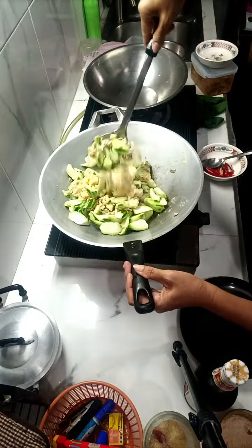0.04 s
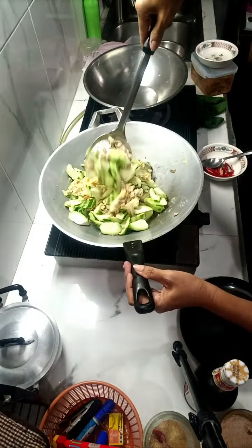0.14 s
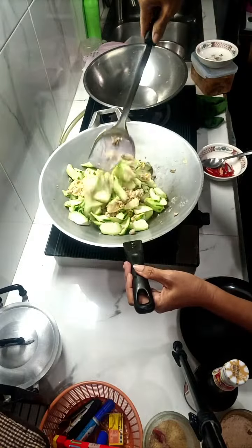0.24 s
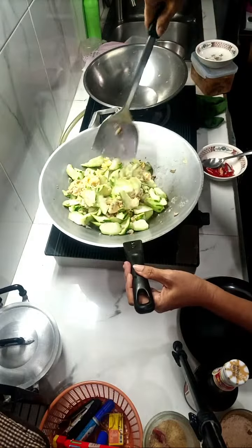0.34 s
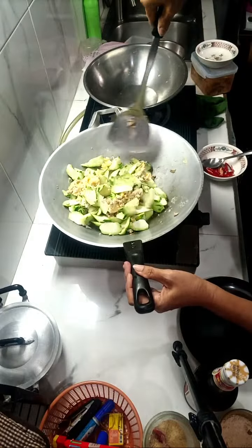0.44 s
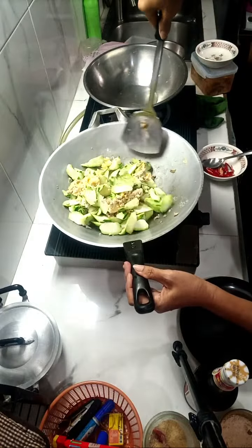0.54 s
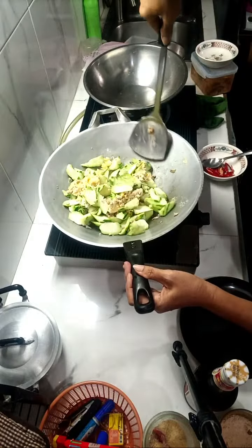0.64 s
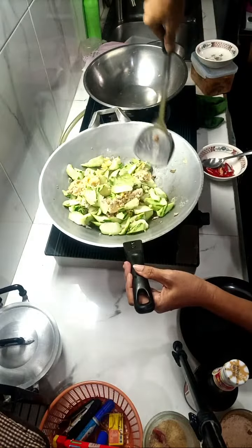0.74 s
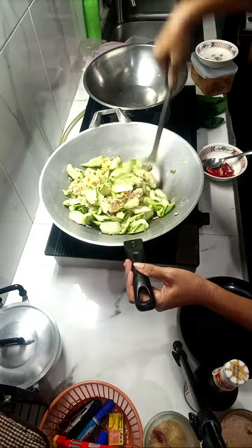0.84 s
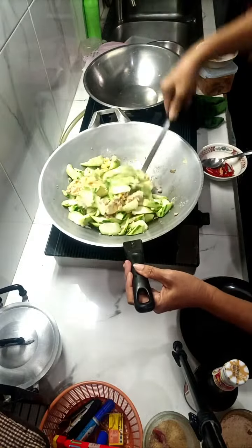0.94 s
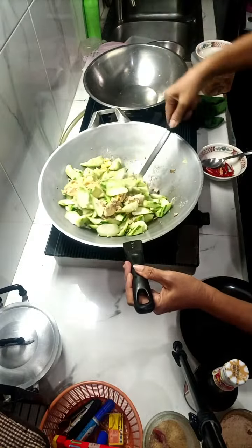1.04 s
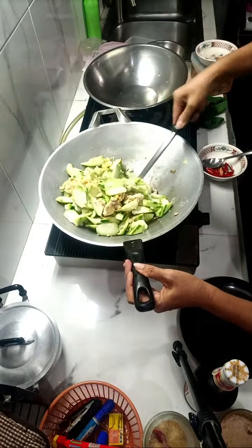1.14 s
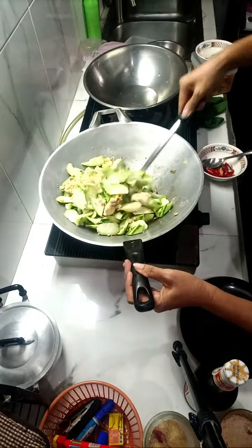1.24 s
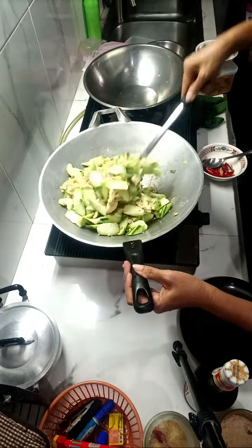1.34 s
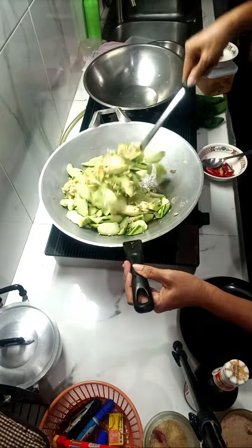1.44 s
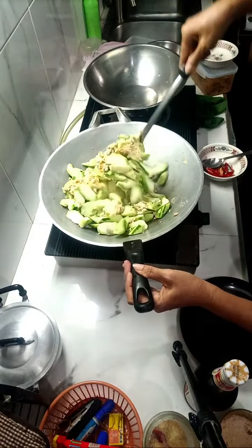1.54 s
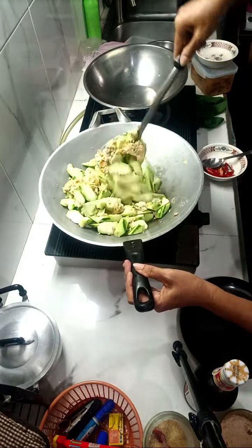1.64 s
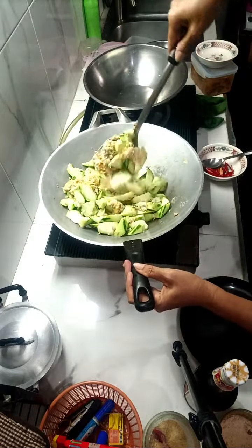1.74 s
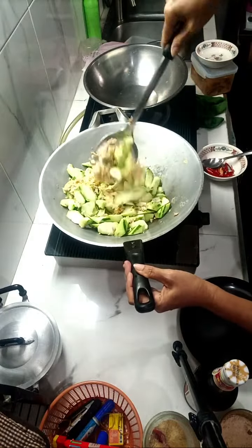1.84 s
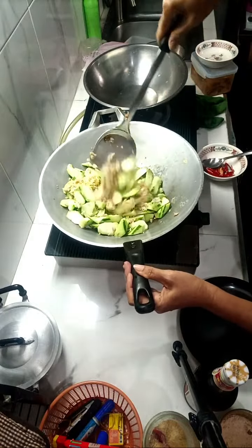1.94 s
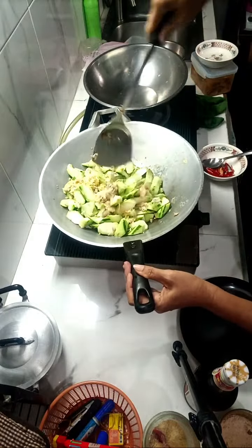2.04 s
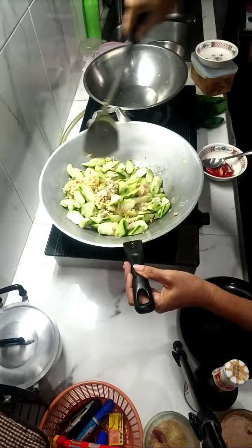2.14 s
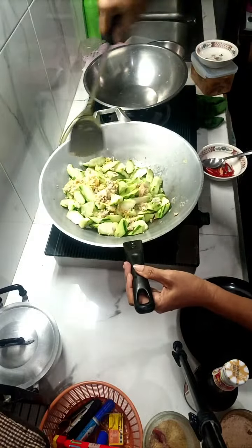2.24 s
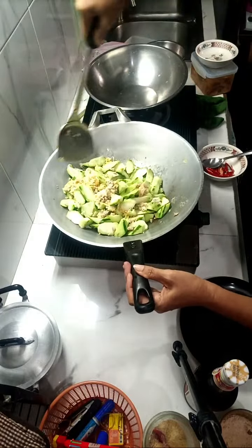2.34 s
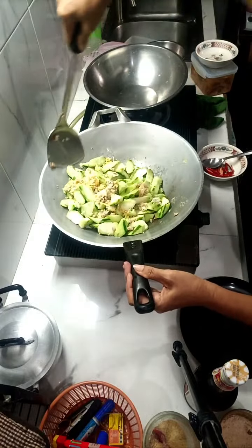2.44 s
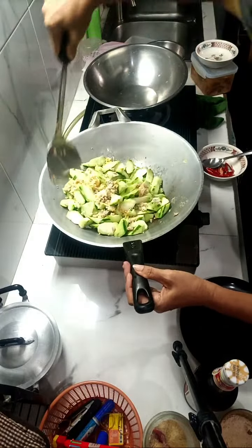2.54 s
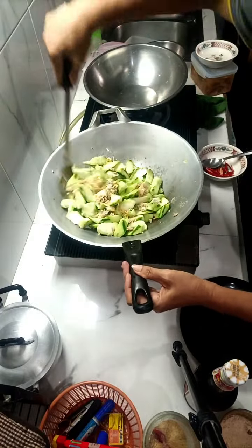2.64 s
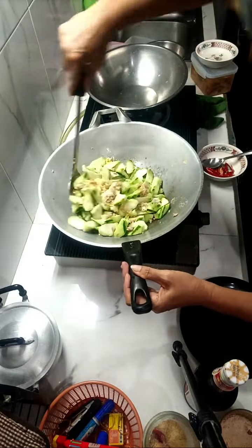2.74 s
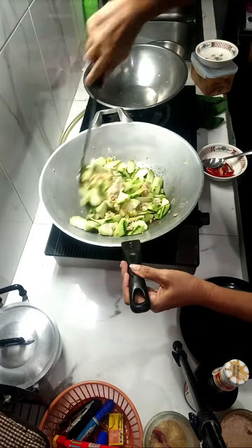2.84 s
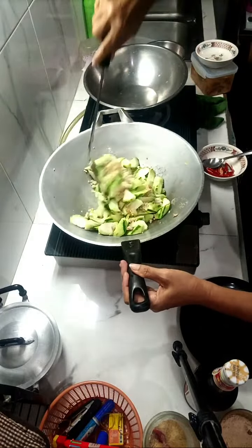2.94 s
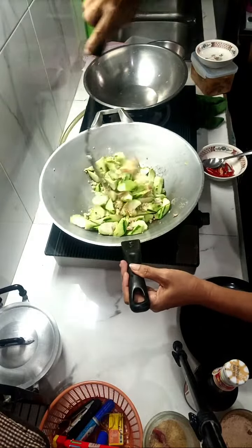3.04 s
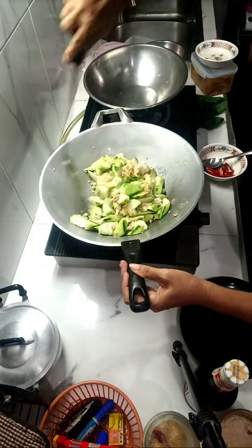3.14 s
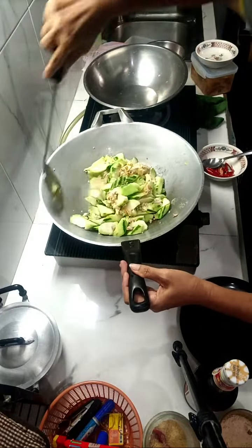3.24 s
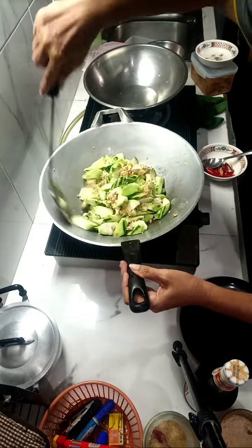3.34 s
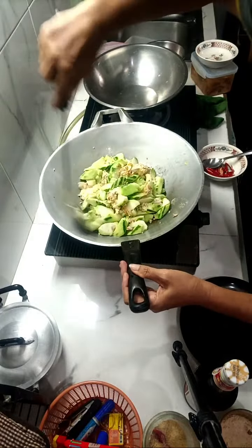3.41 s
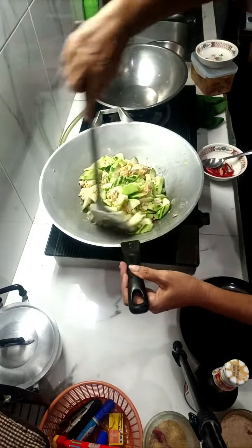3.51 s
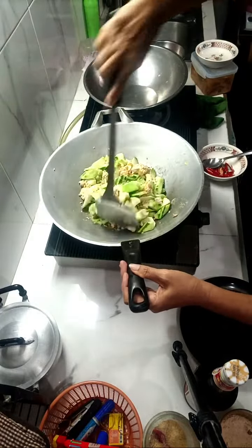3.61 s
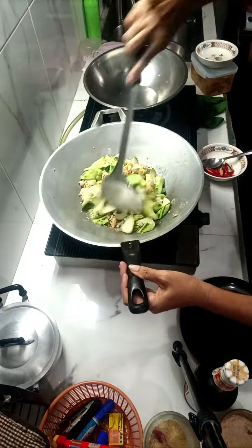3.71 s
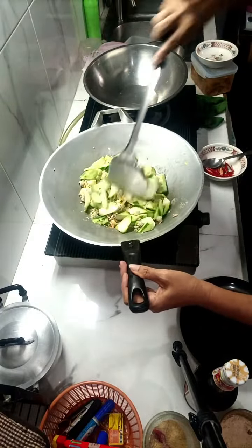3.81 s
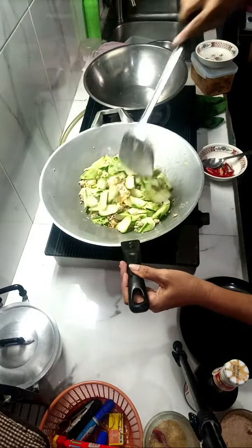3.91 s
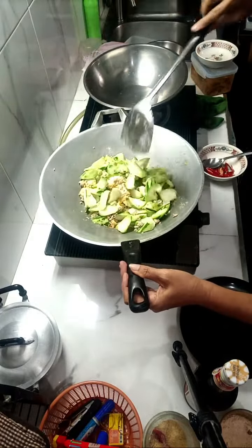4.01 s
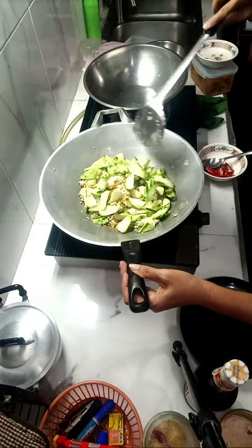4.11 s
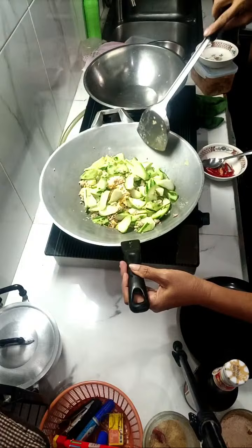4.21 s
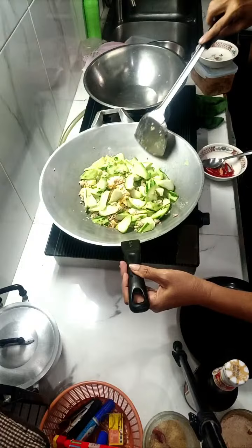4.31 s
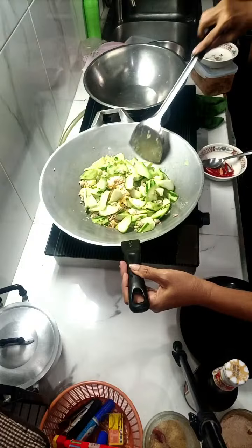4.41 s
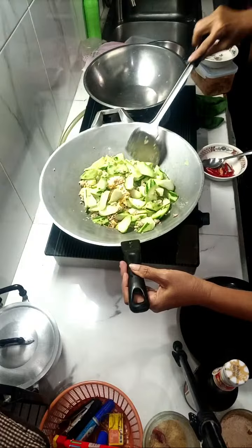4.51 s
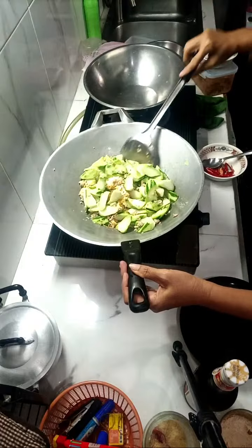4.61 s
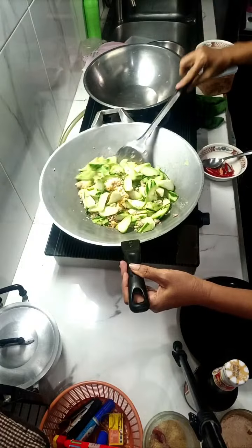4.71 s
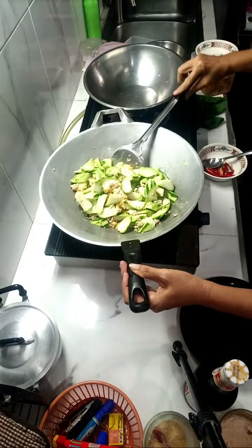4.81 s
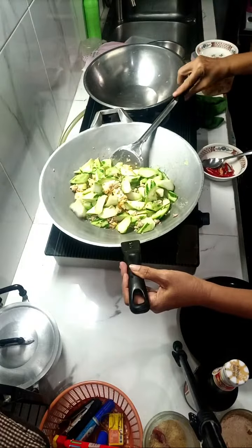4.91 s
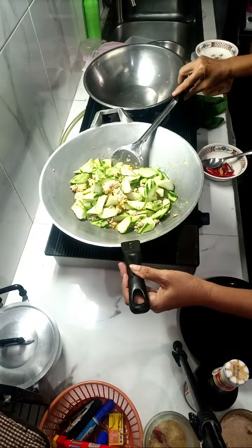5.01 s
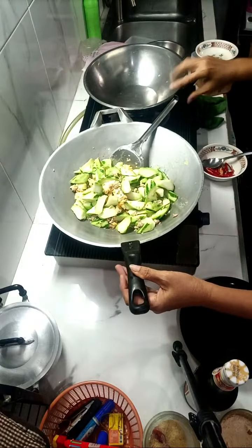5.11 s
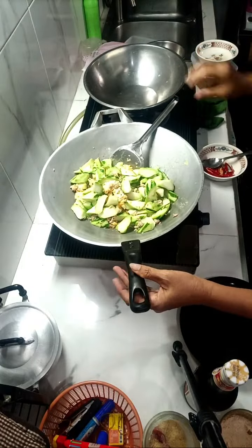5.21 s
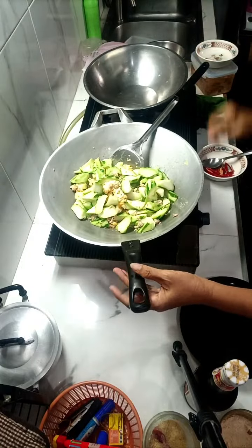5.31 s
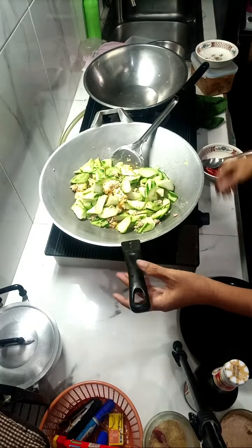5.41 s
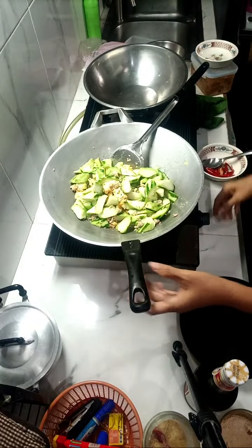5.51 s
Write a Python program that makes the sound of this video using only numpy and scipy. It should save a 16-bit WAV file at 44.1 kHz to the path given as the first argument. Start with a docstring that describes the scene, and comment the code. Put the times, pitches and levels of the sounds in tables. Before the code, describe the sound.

Close by in a small tiled kitchen, a faint sizzle and a low room hum are broken by a sharp clank and scrape of a metal spatula in a wok. Dull knocks follow as the wok rocks on its stand. More clanks, gritty scrapes and brief squeals come in uneven bursts, with a soft wet rustle of vegetables being turned, and a few light knocks finish it.

```python
"""Clanks and scrapes of a steel spatula in a metal wok: vegetables stir-fried in a small tiled kitchen.
Blows ring the modes of wall and blade; the sliding edge sticks, slips and briefly squeals.
As the food is turned over, the loaded wok knocks dully on its stand.
Below lie a faint sizzle of bursting droplets and the hum of the room."""
import sys
import numpy as np
from scipy import signal
from scipy.io import wavfile

SR = 44100
rng = np.random.default_rng(int(sys.argv[2]) if len(sys.argv) > 2 else 0)


def log_audio(samples):
    """Write samples as a 16-bit WAV file to the path given in sys.argv[1]."""
    # one column per channel
    frames = np.atleast_2d(samples).T
    # limit to full scale, then quantise
    limited = np.clip(frames, -1, 1)
    pcm = np.round(limited * 32767).astype(np.int16)
    wavfile.write(sys.argv[1], SR, pcm)


N = 245318
T = np.arange(N) / SR


def from_db(db):
    """Decibels to gain."""
    return 10 ** (np.asarray(db) / 20)


def unit_rms(x):
    """Scale to unit power."""
    return x / np.sqrt(np.mean(x ** 2) + 1e-20)


def at_hz(points, hz):
    """Read a table on a log-frequency axis."""
    freqs, values = np.transpose(points)
    return np.interp(np.log(hz), np.log(freqs), values)


def add(track, time_s, sound):
    """Mix a sound in at a given time."""
    start = max(round(time_s * SR), 0)
    track[start:start + len(sound)] += sound[:N - start]


def butter(x, order, hz, kind="low"):
    """Butterworth filter."""
    return signal.sosfilt(signal.butter(order, hz, kind, fs=SR, output="sos"), x)


def resonate(x, resonances):
    """Parallel resonators, alternating in sign."""
    out = np.zeros_like(x)
    for k, (hz, width_hz, db) in enumerate(resonances):
        r = np.exp(-np.pi * width_hz / SR)
        feedback = [1, -2 * r * np.cos(2 * np.pi * hz / SR), r * r]
        out += (-1) ** k * from_db(db) * signal.lfilter([1 - r * r, 0, r * r - 1], feedback, x)
    return out


def through_bands(spectrum, drive):
    """Third-octave bands, each fed by drive(hz) and weighted by the spectrum."""
    edges_hz = 35 * 2 ** (np.arange(28) / 3.04)
    out = np.zeros(N)
    for low, high in zip(edges_hz, edges_hz[1:]):
        hz = np.sqrt(low * high)
        if spectrum[0][0] < high and low < spectrum[-1][0]:
            out += from_db(at_hz(spectrum, hz)) * butter(drive(hz) + 1e-18, 3, [low, high], "band")
    return out


def drift(rate_hz):
    """Bounded random wander, unit RMS."""
    knots = rng.uniform(-0.92, 1, 6000)
    return unit_rms(np.interp(T * rate_hz, np.arange(len(knots)), knots))


def grains(per_s, spread_db):
    """Random impulses of uneven size, unit RMS."""
    sizes = from_db(spread_db * np.minimum(rng.exponential(1, N), 4)) * rng.choice([-1, 1], N)
    return unit_rms(sizes * (rng.random(N) < per_s / SR))


def decay(t60_s):
    """One second of exponential decay."""
    return from_db(-60 * T[:SR] / max(t60_s, .003))


def mode(hz, t60_s):
    """Struck mode of unit height, random sign."""
    return np.sin(2 * np.pi * hz * T[:SR]) * decay(t60_s) * rng.choice([-1, 1])


def room_hum(level_db=-62):
    """Steady low noise of the room."""
    # (frequency [Hz], band gain [dB])
    spectrum = [(18, -43), (30, -21), (43, -12.5), (70, -10), (118, 0.5), (204, -16.5), (284, -4),
                (370, -24), (465, -7.5), (761, -15.5), (923, -8.5), (1030, -20), (1200, -10), (2000, -35.5),
                (2600, -42), (4400, -120)]
    return from_db(level_db) * unit_rms(through_bands(spectrum, lambda hz: rng.standard_normal(N)))


def kitchen(x, wet_db=-13, t60_s=0.45, cutoff_hz=5000):
    """Direct sound plus dense, slightly dull reflections from the tiles."""
    echoes = rng.standard_normal(SR) * decay(t60_s) * (T[:SR] > .004)
    echoes = butter(echoes / np.linalg.norm(echoes), 1, cutoff_hz)
    return x + from_db(wet_db) * signal.fftconvolve(x, echoes)[:N]


def stroke_levels(bite_s=0.022, lift_t60_s=0.19):
    """Each spatula stroke bites in, eases off and lifts; returns the drive of wall, blade and food."""
    # (start [s], end [s], wall [dB], blade [dB], food [dB], easing of pressure [dB/s])
    strokes = [(0.793, 0.932, -26.5, -28.5, -36.5, 99.5), (0.959, 1.02, -39, -47.5, -50, 20),
               (1.131, 1.188, -49, -59, -58, 9), (2.475, 2.574, -36.5, -44.5, -48, 23),
               (2.59, 2.698, -44.5, -44.5, -51.5, 61), (3.27, 3.392, -44, -41, -65, 45),
               (3.437, 3.496, -34.5, -40.5, -48.5, 26), (4.379, 4.45, -33.5, -50, -48, 10),
               (4.48, 4.771, -34.5, -44.5, -50.5, 58)]
    drive = np.zeros((3, N))
    for start, end, *levels_db, easing in strokes:
        bite = np.clip((T - start) / bite_s, 0, 1)
        eased_db = easing * np.clip(T - start, 0, end - start)
        lifted_db = 60 * np.maximum(T - end, 0) / lift_t60_s
        drive += np.outer(from_db(levels_db), bite * from_db(-eased_db - lifted_db))
    return drive


def rustle(rest_db=-67):
    """Wet slices simmer at rest and slide over each other under the spatula."""
    # (frequency [Hz], band gain [dB])
    spectrum = [(900, -16.5), (1400, 3.5), (2100, 1.5), (2800, 0), (3600, -1), (5000, -9), (7000, -16.5)]
    _, _, pushed = stroke_levels()
    texture = through_bands(spectrum, lambda hz: grains(7500, spread_db=2) * from_db(0.99 * drift(8.6)))
    return np.hypot(from_db(rest_db), pushed) * unit_rms(texture)


def sizzle(rise_db_per_s=155, fall_db_per_s=71.5):
    """Droplets burst on the hot metal, flaring when liquid runs onto a bare spot."""
    # (frequency [Hz], band gain [dB])
    spectrum = [(3240, -53), (5500, -38), (6400, -6), (6910, -23.5), (7660, -10.5), (8000, -12),
                (8750, -10.5), (10500, -5.5), (11900, -3), (15000, -4.5), (16000, -8)]
    # steady sizzle: (time [s], level [dB])
    bed = [(0, -69), (1.5, -67), (4.5, -66), (5.56, -69)]
    # (peak time [s], level [dB])
    flares = [(0.79, -43.5), (1.23, -58.5), (2.46, -57), (2.62, -56), (3.46, -60), (4.42, -61)]
    power = from_db(np.interp(T, *np.transpose(bed))) ** 2
    for peak_s, db in flares:
        power += from_db(db - np.maximum(rise_db_per_s * (peak_s - T), fall_db_per_s * (T - peak_s))) ** 2
    droplets = through_bands(spectrum, lambda hz: grains(17000, spread_db=1.5))
    return np.sqrt(power) * unit_rms(droplets)


def brief_tones(waver_depth=0.027, waver_hz=600, flutter_db=5, flutter_hz=150):
    """Wavering squeals of the sliding edge, and clear wok notes singing on after a blow."""
    # (start [s], end [s], start pitch [Hz], end pitch [Hz], level [dB], roughness [factor])
    notes = [(0.081, 0.27, 2170, 2180, -64, 1.15), (0.504, 0.632, 2020, 2136, -60.5, 0.9),
             (0.799, 0.892, 2190, 2250, -30, 0.69), (0.79, 0.857, 1151, 1154, -27, 0),
             (0.88, 0.92, 1149, 1170, -29.5, 0.16), (1.548, 1.588, 3400, 3470, -57.5, 0.36),
             (1.674, 1.828, 340.4, 324, -53, 0.42), (2.5, 2.561, 3200, 3410, -44, 0.4),
             (2.576, 2.713, 3300, 3440, -52.5, 0.13), (2.6, 2.73, 2080, 2300, -54.5, 0.6),
             (3.31, 3.386, 3650, 3390, -48.5, 0.65), (3.31, 3.39, 1153, 1149, -30, .1),
             (3.454, 3.517, 3950, 3710, -48.5, 1.13), (4.275, 4.378, 1826, 1825, -26.5, .04),
             (4.386, 4.452, 1145, 1160, -35, 0.1), (4.391, 4.458, 3500, 3630, -46.5, 0.5),
             (4.578, 4.686, 4000, 3380, -58, 0.46), (4.638, 4.755, 1370, 1450, -45, 0.9),
             (4.662, 4.742, 2364, 2340, -55, 0.6), (4.673, 4.768, 4200, 4530, -63, 0.5),
             (4.71, 4.759, 1147, 1136, -38, 0.47)]
    waver = waver_depth * drift(waver_hz)
    flutter = flutter_db * drift(flutter_hz)
    out = np.zeros(N)
    for start, end, from_hz, to_hz, db, roughness in notes:
        span = slice(int(start * SR), int(end * SR))
        progress = np.linspace(0, 1, len(T[span]))
        hz = (from_hz + (to_hz - from_hz) * progress) * (1 + roughness * waver[span])
        level = from_db(db + roughness * flutter[span]) * np.abs(np.sin(np.pi * progress)) ** .5
        out[span] += level * np.sin(2 * np.pi * np.cumsum(hz) / SR)
    return out


def scrapes(wall_db=-3, blade_db=-3, grit_db=-15, slips_per_s=800, judder_db=2, judder_hz=70):
    """The edge sticks and slips along the metal and keeps wall and blade ringing."""
    # resonances, both: (frequency [Hz], width [Hz], gain [dB])
    wall_modes = [(740, 30, -5), (930, 84, 0.5), (1110, 27, 11), (1280, 32, -8.5), (1363, 110, -1)]
    blade_modes = [(1776, 44, 0), (2097, 150, -1.5), (2380, 70, -4.5), (3370, 200, -6.5), (3700, 280, -6),
                   (4630, 300, -9.5)]
    wall_drive, blade_drive, _ = stroke_levels()
    slips = grains(slips_per_s, spread_db=3) * from_db(judder_db * drift(judder_hz))
    wall = from_db(wall_db) * unit_rms(butter(resonate(slips, wall_modes), 2, [500, 1700], "band"))
    blade = from_db(blade_db) * unit_rms(butter(resonate(slips, blade_modes), 3, [1400, 5200], "band"))
    grit = from_db(grit_db) * unit_rms(butter(slips, 4, 8500, "high"))
    return wall_drive * wall + blade_drive * (blade + grit)


def rocking(period_s=0.041, loss_db=7.5, pitch_rise=0.152):
    """The wok rocks back, each rebound weaker and higher; lists every contact with the stand."""
    # contacts with the stand, some of them rebounds of the knock just before, each followed by its listed
    # rebounds: (time [s], level [dB], centre [Hz], ring length [factor], rebounds [count])
    contacts = [(0.003, -41.5, 712, 1.28, 0), (0.836, -23, 440, 2.34, 0), (0.855, -27, 587, 1.9, 0),
                (0.987, -21.5, 415, 0.96, 0), (1.010, -18, 534, 1.32, 0), (1.142, -17, 429, 0.83, 0),
                (1.183, -24, 558, 0.7, 1), (1.293, -23.5, 488, 0.79, 0), (1.497, -42, 452, 2.54, 0),
                (1.529, -30.5, 483, 0.86, 0), (1.854, -37, 508, 1.46, 0),
                (1.917, -32.5, 672, 0.76, 0), (2.540, -29.5, 276, 0.77, 0), (2.591, -34, 560, 1.1, 0),
                (2.675, -34, 740, 0.66, 1), (2.835, -42, 440, 1.6, 0), (2.909, -30, 608, 1.41, 0),
                (3.369, -28.5, 490, 1.4, 0), (3.466, -20, 451.5, 1.54, 2),
                (3.596, -25.5, 487, 0.68, 0), (3.717, -25.5, 467, 0.18, 0),
                (3.867, -29.5, 568, 1.1, 0), (4.020, -33, 597, 0.9, 0), (5.104, -43.5, 563, 2.2, 0),
                (5.197, -31.5, 435, 2.4, 0), (5.257, -29.5, 521, 0.62, 1)]
    return [(time_s + k * period_s, db - k * loss_db, centre_hz * (1 + pitch_rise) ** k, length)
            for time_s, db, centre_hz, length, rebounds in contacts
            for k in range(1 + round(rebounds))]


def knocks(thud_db=9, ring_db=-1, bump_db=3, bump_t60_s=0.091, thud_t60_s=0.26, focus_db=7):
    """Wok on its stand, cushioned by food: a short bump, a thud and the low modes of the bowl."""
    # (frequency [Hz], level [dB], t60 [s])
    bowl_modes = [(240.7, -5, 0.21), (282.6, -10, 0.2), (341.2, -11.5, 0.27), (405, -13.5, 0.12),
                  (455.5, -2, 0.1), (599.5, -6, 0.24), (654, -6.5, 0.27), (705.3, -4.5, 0.25)]
    # (frequency [Hz], band gain [dB])
    thud_spectrum = [(100, -12), (180, -24), (250, 1.5), (450, -4), (720, -7), (900, -8.5), (1150, -17.5),
                     (1500, -27.5), (3000, -28.5)]
    onset = 1 - decay(t60_s=0.025)   # each knock swells in over a few cycles

    def strength(db, centre_hz, hz):
        return from_db(db - focus_db * min(np.log2(hz / centre_hz) ** 2, 1))

    def thud(hz):
        level = np.zeros(N)
        for time_s, db, centre_hz, length in rocking():
            add(level, time_s - .005, strength(db, centre_hz, hz) * onset * decay(thud_t60_s * length))
        return level * rng.standard_normal(N)

    tones = np.zeros(N)
    for time_s, db, centre_hz, length in rocking():
        blow = from_db(db + bump_db) * mode(centre_hz, bump_t60_s)
        for hz, mode_db, t60_s in bowl_modes:
            shifted_hz = hz * (1 + .006 * rng.standard_normal())   # the load moves about
            gain = from_db(ring_db + mode_db) * strength(db, centre_hz, hz)
            blow += gain * mode(shifted_hz, t60_s * length)
        add(tones, time_s - .003, onset * blow)
    tones = butter(tones, 4, 950)
    tones = butter(tones, 3, 130, "high")   # little radiates below the lowest modes
    return from_db(thud_db) * through_bands(thud_spectrum, thud) + tones


def clustered(x):
    """Sheet modes crowd in groups with quiet gaps between."""
    # (frequency [Hz], width [Hz], share removed [dB, capped at 0])
    gaps = [(560, 39.8, -2.5), (827, 110, -4.5), (1297, 75, -5.5), (1597, 210, -1.5), (2612, 160, -9),
            (3050, 69, 4), (4005, 320, -2)]
    for hz, width_hz, db in gaps:
        x = x - resonate(x, [(hz, width_hz, min(db, 0))])
    return x


def clanks(sheet_db=14, ring_db=-2, crack_t60_s=0.081, snap_db=7, snap_t60_s=0.008):
    """Steel hits the wall: a crack, a wash of close sheet modes, and clear tones set by the spot hit."""
    # (time [s], five zone levels [dB], ring length [factor], favoured mode [Hz], its boost [dB])
    blows = [(0.7494, -36, -38.5, -35.5, -32.5, -29, 0.78, 3450, 11),
             (0.7771, -18, -28.5, -23.5, -22.5, -24.5, 0.52, 3450, 16.5),
             (2.4605, -31.5, -26.5, -38, -35.5, -34.5, 1.2, 925, 4),
             (3.2749, -30.5, -23, -34.5, -31, -26.5, 0.95, 1151, 5),
             (4.2696, -39, -19, -26, -27, -23.5, 0.97, 1215, 7.5),
             (4.4619, -19, -23, -25, -34.5, -48, 0.84, 398, 8),
             (4.9317, -34.5, -30.5, -33.5, -35, -33, 0.58, 925, 10)]
    # zones: (bowl [Hz], wall [Hz], upper wall [Hz], blade [Hz], crack [Hz])
    zones_hz = [450, 1100, 2000, 3600, 11000]
    # wok and blade: (frequency [Hz], level [dB], t60 [s])
    wok_modes = [(922, -3, .27), (1151, -3, .38), (1826, -7, .42), (3452, -7, .17), (335, -5, .35),
                 (398, -10, .35), (476, -3, .3), (1070, -5, .25), (1110, -9, .25), (1215, -6, .18),
                 (1388, -12, .35), (2060, -10, .3), (2135, -10, .35), (2270, -7, .3), (2875, -13, .4),
                 (3205, -9, .27), (3395, -8, .22), (4350, -13, .2), (4470, -12, .2), (4690, -14, .2),
                 (8950, -15, .12), (9300, -15, .12), (11780, -13, .1)]
    # (frequency [Hz], band gain [dB])
    sheet_spectrum = [(110, -14.5), (185, -15.5), (255, 2), (450, -2), (750, 2), (1100, -5.5), (1500, -3.5),
                      (2150, 0.5), (2650, -10.5), (3500, -3), (4600, -13), (6000, -21), (7800, -22),
                      (9500, -18), (15000, -14.5)]
    # (frequency [Hz], t60 [s])
    sheet_t60 = [(250, 0.59), (700, 0.53), (2000, 0.54), (4000, 0.28), (12000, 0.51)]

    def strength(zones_db, hz):
        return from_db(at_hz(list(zip(zones_hz, zones_db)), hz))

    def wash(hz):
        level = np.zeros(N)
        tail = from_db(at_hz([(1000, -4), (11000, -15)], hz))   # treble is spent in the first crack
        onset = 1 - decay(3.3 / hz)   # long bending waves spread more slowly
        snap = from_db(snap_db) * min(hz / zones_hz[3], 1) * decay(snap_t60_s)   # first touch of the edge
        for time_s, *zones_db, length, _, _ in blows:
            shape = (1 - tail) * decay(crack_t60_s) + tail * decay(length * at_hz(sheet_t60, hz))
            add(level, time_s, strength(zones_db, hz) * (shape + snap) * onset)
        return level * rng.standard_normal(N)

    tones = np.zeros(N)
    for time_s, *zones_db, length, favoured_hz, boost_db in blows:
        nearest = np.argmin([abs(hz - favoured_hz) for hz, _, _ in wok_modes])
        for k, (hz, db, t60_s) in enumerate(wok_modes):
            gain = from_db(db + boost_db * (k == nearest)) * strength(zones_db, hz)
            add(tones, time_s, gain * mode(hz, t60_s * length))
    sheet = clustered(through_bands(sheet_spectrum, wash))
    return from_db(sheet_db) * sheet + from_db(ring_db) * butter(tones, 3, 190, "high")


def scene():
    """Spatula and wok in the room, over the frying and the hum; mono."""
    hum = room_hum()
    wok = kitchen(clanks() + knocks() + scrapes() + brief_tones())
    return (hum + wok + rustle() + sizzle())[None]


def record(dry, dip_hz=7000, dip_width_hz=2600, dip_db=-12, cutoff_hz=16000):
    """Tone colour: a hollow near 7 kHz, two small bright peaks above it, top cut off."""
    # (frequency [Hz], width [Hz], added share [dB])
    bright_peaks = [(9320, 500, -7.5), (11750, 400, -12.5)]
    b, a = signal.iirnotch(dip_hz, dip_hz / dip_width_hz, fs=SR)
    dipped = from_db(dip_db) * dry + (1 - from_db(dip_db)) * signal.lfilter(b, a, dry)
    peaked = dipped + sum(resonate(dipped, [peak]) for peak in bright_peaks)
    return signal.sosfilt(signal.ellip(10, .2, 80, cutoff_hz, fs=SR, output="sos"), peaked)


dry = scene()
out = record(dry)
log_audio(out)
```